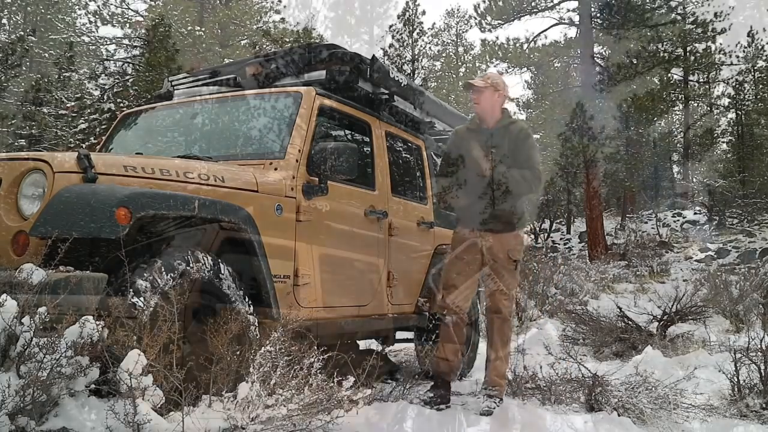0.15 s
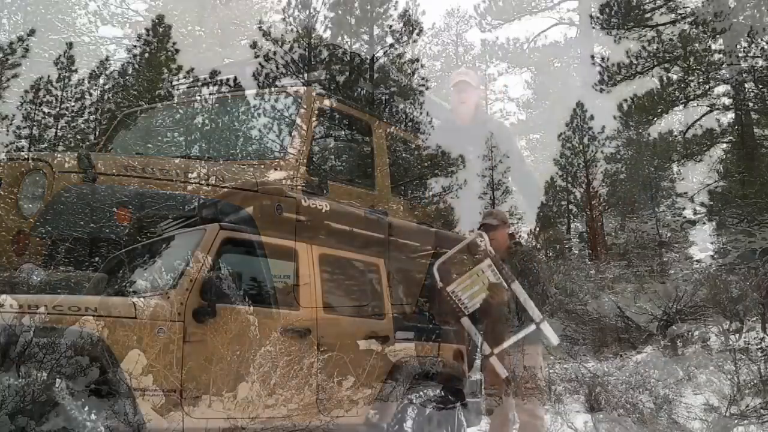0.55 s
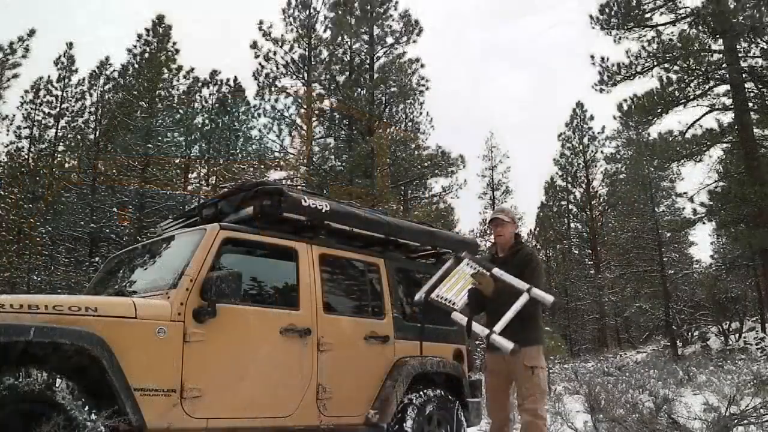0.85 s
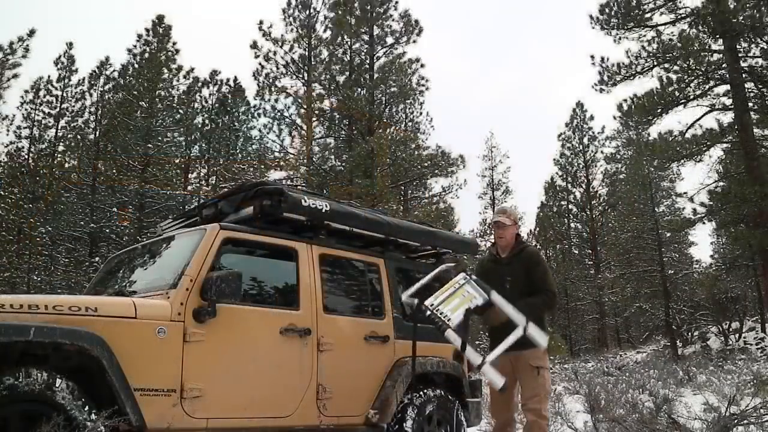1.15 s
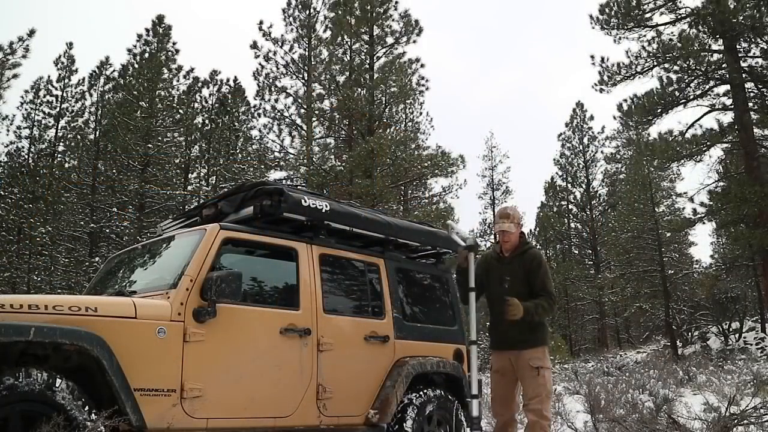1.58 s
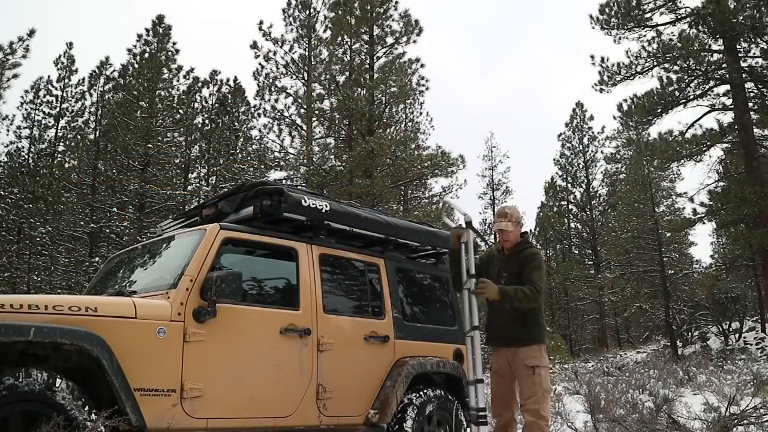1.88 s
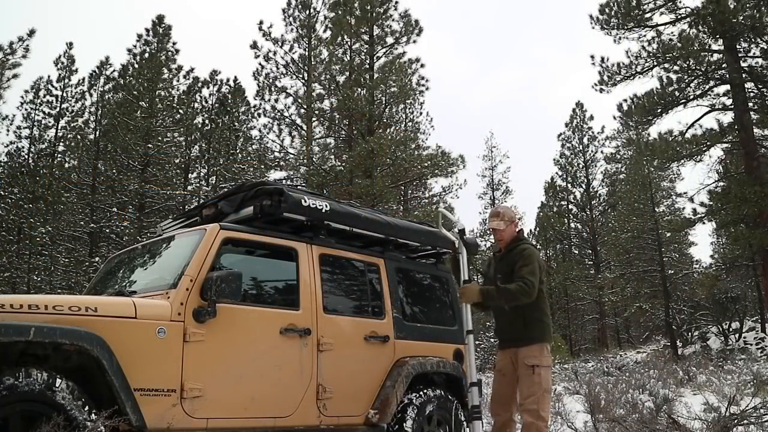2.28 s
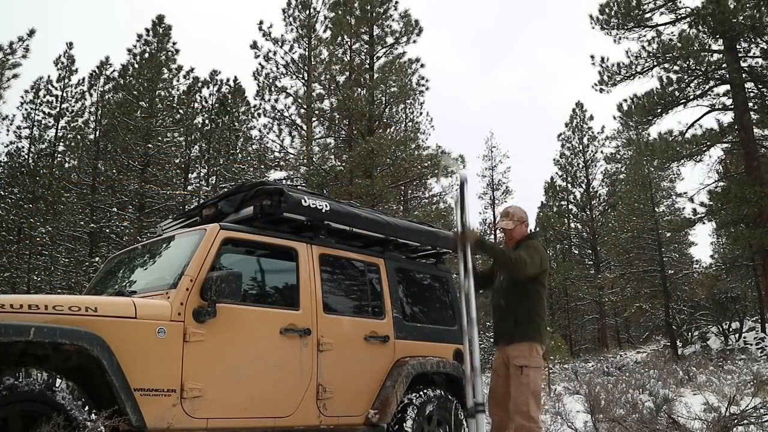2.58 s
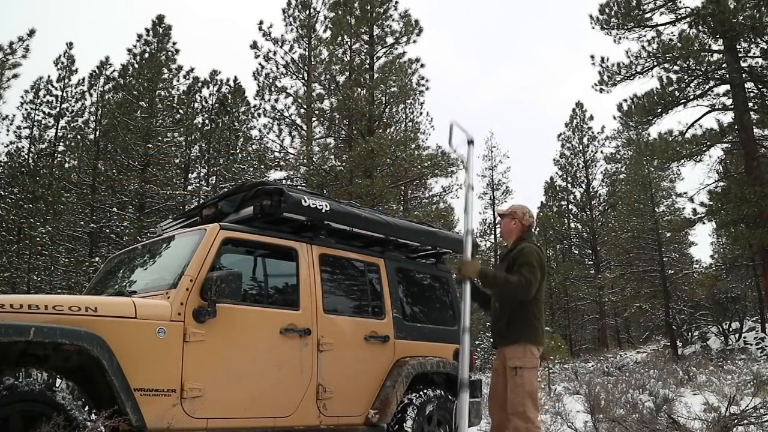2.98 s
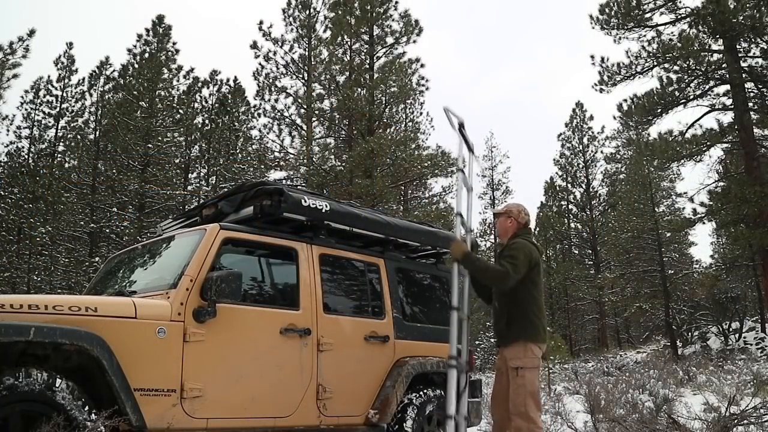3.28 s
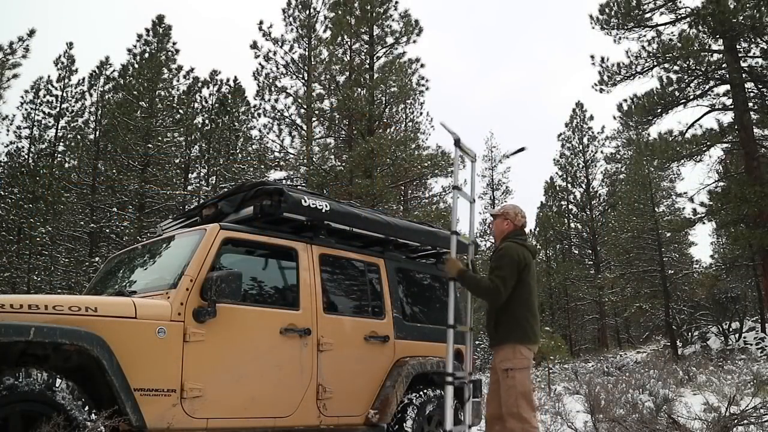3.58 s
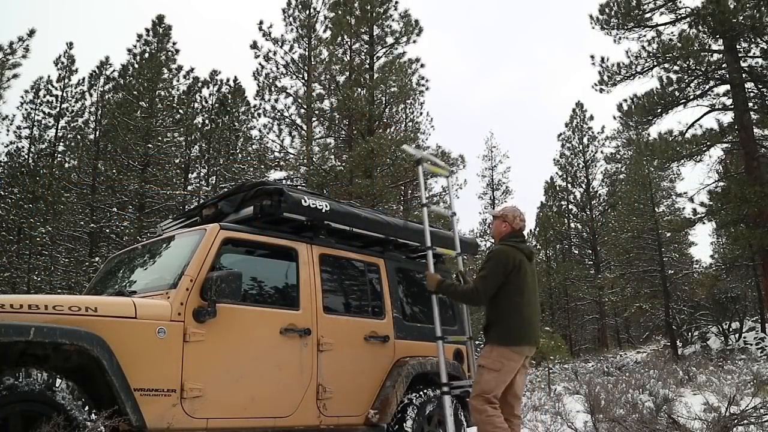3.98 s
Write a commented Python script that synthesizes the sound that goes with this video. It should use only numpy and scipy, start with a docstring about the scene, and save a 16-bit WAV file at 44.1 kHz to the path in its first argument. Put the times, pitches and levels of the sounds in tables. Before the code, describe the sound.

Quiet snowy woods, stereo, from a few metres: a soft thud and faint rustle, a single cupped hand clap over fading low rumble, then a pause. Light metal ticks lead to a burst of hard hollow clacks, followed by separate knocks as ladder sections slide out, scraping and squeaking. Faint rings and a weak woodland echo trail off, and smaller clicks end it in near silence.

```python
"""A snowy forest: one dull hand clap, then a telescoping aluminium ladder is lifted, set down and pulled out
a few metres away. Its tubes slide as gritty noise, squeak as narrow noise bands, chatter against their stops
as bursts of contacts and ring faintly as dying sines; snowy ground and trees give back a thin noise echo.
Soft thuds and rustles are shaped noise. A low rumble dies away at the start and leaves the hush of the forest."""
import sys
import numpy as np
from scipy import signal
from scipy.fft import rfft, irfft
from scipy.io import wavfile
from scipy.ndimage import uniform_filter1d

SR = 44100
rng = np.random.default_rng(int(sys.argv[2]) if len(sys.argv) > 2 else 0)


def unload_wav(signal):
    """Save mono or channel-first audio to the path in sys.argv[1] as 16-bit WAV at rate SR, clipped to [-1, 1]."""
    wavfile.write(
        sys.argv[1],
        SR,
        np.round(np.clip(np.atleast_2d(signal).T, -1, 1) * 32767).astype(np.int16),
    )


N = 182262
TIME = np.arange(N) / SR

# colour of tube rubbing on tube: frequency_hz, relative level_db (per Hz)
RUB = [(290, -38), (500, -7), (1410, -7.5), (1590, 0), (2010, 0), (2430, -2), (2790, -5), (4080, -2),
       (5080, -11.5), (5660, -8), (13000, -44.5)]
# left-right likeness of diffuse sound: frequency_hz, likeness (0 to 1)
DIFFUSE = [(60, 0.071), (400, 0.0031), (2000, 0.017), (12000, 0)]


def gain_of(db):
    """Decibels to amplitude."""
    return 10 ** (np.asarray(db) / 20)


def evened(x):
    """Scaled to rms 1."""
    return x / np.sqrt(np.mean(x ** 2) + 1e-20)


def unit(x):
    """Scaled to a mean energy of 1 per channel."""
    return evened(x) / np.sqrt(x.shape[-1])


def read(points, hz):
    """A frequency table read on a log-frequency axis."""
    table_hz, value = np.transpose(points)
    return np.interp(np.log(hz + 1), np.log(abs(table_hz) + 1), value)


def level(curve):
    """A dB curve over time as a gain for every sample."""
    return gain_of(np.interp(TIME, *np.transpose(curve)))


def add(mix, start_s, sound):
    """Mixes a sound in at its start time."""
    part = mix[:, max(round(start_s * SR), 0):][:, :sound.shape[-1]]
    part += sound[..., :part.shape[1]]


def coloured(x, db_at, size=2048):
    """Minimum-phase filter with the gain db_at(Hz), so that attacks stay sharp."""
    hz = abs(np.fft.fftfreq(size, 1 / SR))
    log_gain = np.log(gain_of(np.maximum(db_at(hz), -100)))
    taps = np.fft.ifft(np.exp(np.conj(signal.hilbert(log_gain)))).real
    return signal.fftconvolve(x, taps[None], axes=1)[:, :x.shape[1]]


def noise_pair(size, colour=((1, 0), (SR, 0)), likeness=None):
    """Noise of a given colour, partly alike at the two microphones."""
    # left-right likeness of direct sound: frequency_hz, likeness (0 to 1)
    direct = [(60, 0.34), (200, 0.37), (500, 0.97), (1300, 0.74), (2600, 0.66), (5000, 0.39), (12000, 0.39)]
    hz = np.fft.rfftfreq(size, 1 / SR)
    left, other = rfft(rng.standard_normal((2, size)))
    same = np.clip(read(direct if likeness is None else likeness, hz), -1, 1)
    right = same * left + np.sqrt(1 - same ** 2) * other
    return evened(irfft(np.array([left, right]) * gain_of(read(colour, hz)), size))


def flutter(depth_db, size):
    """A gain that wanders at random over about size samples."""
    wander = evened(uniform_filter1d(rng.standard_normal(N), size))
    return evened(gain_of(depth_db * wander))


def strokes(rows, rise_db_per_s, fall_db_per_s):
    """The gain of a series of movements: each swells, holds and dies away."""
    gain = 0
    for start_s, length_s, level_db in rows:
        rise_db = rise_db_per_s * np.maximum(start_s - TIME, 0)
        fall_db = fall_db_per_s * np.maximum(TIME - start_s - length_s, 0)
        gain = gain + gain_of(level_db - rise_db - fall_db)
    return gain


def from_right(x, lag_s, side_db):
    """The left microphone hears the sound later and weaker."""
    delay = np.exp(-2j * np.pi * np.fft.rfftfreq(N, 1 / SR) * lag_s)
    left = irfft(rfft(x[0]) * delay, N)
    return np.array([left * gain_of(-side_db / 2), x[1] * gain_of(side_db / 2)])


def hush():
    """The quiet forest: diffuse noise with a slow swell and a small random flutter."""
    # colour: frequency_hz, relative level_db (per Hz)
    hush_colour = [(15, -44.5), (25, -13.5), (113, -4.5), (237, -15), (286, -4.5), (344, -7), (392, -5),
                   (448, -3.5), (684, -6), (1230, -13.5), (2640, -18.5), (6160, -31), (12000, -41.5),
                   (15000, -54)]
    # slow change of level: time_s, level_db
    swell = [(0, 0), (.55, -1), (.78, 1), (1, 3.5), (3.3, 2), (4.13, 2.5)]
    return gain_of(-65.5) * noise_pair(N, hush_colour, DIFFUSE) * level(swell) * flutter(.7, size=4000)


def rumble():
    """Air on the microphones: low, fluttering noise that fades steadily, then closes to silence."""
    # colour: frequency_hz, relative level_db (per Hz)
    rumble_colour = [(18, -54), (30, -29), (87, 1), (273, 1.5), (412, -11.5), (485, -16), (526, -22),
                     (1150, -28.5), (1320, -40.5), (1500, -23), (1950, -57), (3300, -120)]
    start_db, fade_db_per_s = -47.5, 32
    fade = gain_of(start_db - fade_db_per_s * TIME) * np.interp(TIME, [.65, .9], [1, 0])
    return noise_pair(N, rumble_colour, DIFFUSE) * flutter(1.3, size=1500) * fade


def rustle():
    """Boots and cloth of someone moving in snow: fluttering noise in short strokes."""
    # movements: start_s, length_s, level_db
    moves = [(0, 0.0075, -57), (.2, 0.022, -69), (.325, 0.016, -59), (.47, 0.2, -75)]
    colour = [(200, -9.5), (700, 0.0), (2000, 0.5), (4000, -7.5), (8000, -19), (13000, -40.5)]  # (Hz, dB)
    gain = strokes(moves, rise_db_per_s=599.5, fall_db_per_s=150)
    return noise_pair(N, colour, DIFFUSE) * gain * flutter(2.2, size=200)


def thuds(size=8192):
    """Ladder feet and boots push softly against snow and frame: low noise bumps with a rounded onset."""
    # bumps: start_s, level_db (before the envelope), pitch_hz, t60_s
    bumps = [(.016, -27.5, 167, 0.069), (0.534, -57, 119, 0.86), (.605, -62, 124, .2),
             (1.379, -46, 256, 0.047), (1.61, -40.5, 126, 0.12), (2.025, -54, 234, 0.061),
             (2.573, -33.5, 378, .05)]
    t, out = np.arange(size) / SR, np.zeros((2, N))
    for start_s, level_db, hz, t60_s in bumps:
        colour = [(hz / 4, -32), (hz / 2, -9), (hz, 0), (hz * 2, -5), (hz * 5, -35), (hz * 20, -80)]
        push = noise_pair(size, colour, DIFFUSE)
        envelope = (1 - np.exp(-t / 0.0043)) * gain_of(-60 * t / t60_s)
        add(out, start_s, gain_of(level_db) * push * envelope)
    return out


def clap(start_s=.2586, energy_db=6.5, size=4096):
    """Air bursts from between the palms and takes the colour of their hollow; things nearby scatter it."""
    # colour of the hollow: frequency_hz, relative level_db (per Hz)
    hollow = [(59, -58), (100, -29), (229, -19), (502, 0.5), (592, -2), (713, -12), (1100, -8.5),
              (1350, -22), (2050, -3.5), (3030, -20), (3290, -11.5), (3890, -11.5), (4780, -24),
              (8010, -32.5), (14000, -57.5)]
    t, out = np.arange(size) / SR, np.zeros((2, N))
    # the palms meet over a few milliseconds: a flat spectrum, smeared in time
    smear = rfft(rng.standard_normal(size) * np.exp(-t / 0.002))
    flat = irfft(smear / (abs(smear) + 1e-9), size)[None]
    burst = unit(flat * np.exp(-(t / 0.0073) ** 2))
    scatter = gain_of(-13.0) * unit(noise_pair(size) * np.exp(-t / .006))
    hands = coloured(burst + scatter, lambda hz: read(hollow, hz))
    add(out, start_s, gain_of(energy_db) * unit(hands))
    return out


def trees(x, level_db=-24, t60_s=0.63):
    """Trunks scatter a weak, late echo from all sides: a swelling, dying noise tail."""
    # colour of the echo: frequency_hz, relative level_db
    echo = [(100, 1.5), (500, 5.5), (2500, 0.5), (6000, -5.5), (12000, 6)]
    t = np.arange(SR) / SR
    tail = noise_pair(SR, echo, DIFFUSE) * (1 - np.exp(-t / 0.033)) * gain_of(-60 * t / t60_s)
    return gain_of(level_db) * signal.fftconvolve(x, unit(tail), axes=1)[:, :N]


def scrape():
    """Tubes slide in their sleeves: rubbing noise plus grit that catches as sparse, tiny ticks."""
    # sliding strokes: start_s, length_s, level_db
    slides = [(.89, 0.3, -72), (1.28, 0.35, -58), (1.55, .05, -41), (1.78, 0.022, -52),
              (1.97, 0.017, -58.5), (2.1, .1, -74.5), (2.43, 0.24, -53.5), (2.96, 0.18, -65),
              (3.41, 0.23, -69), (3.93, 0.063, -67.5)]
    catches = rng.standard_normal(N) * (rng.random(N) < 220 / SR)  # about 220 a second
    tick = noise_pair(512, RUB) * np.exp(-TIME[:512] / .0015)
    grit = evened(signal.fftconvolve(catches[None], tick, axes=1)[:, :N])
    rubbing = noise_pair(N, RUB) * flutter(1.2, size=150)
    return evened(rubbing + 1.1 * grit) * strokes(slides, rise_db_per_s=380, fall_db_per_s=210)


def squeak(length_s, hz, width_hz, level_db):
    """Friction in the collar feeds one resonance of the tube for the length of a stroke."""
    f = np.geomspace(100, 16000, 600)
    colour = np.transpose([f, -20 * np.log10(1 + (2 * (f - hz) / width_hz) ** 2)])
    size = max(round(length_s * SR), 64)
    return gain_of(level_db) * noise_pair(size, colour) * signal.windows.tukey(size, .8)


def approach(knock_db, rub_db=-27, swell_s=0.0043, size=660):
    """The tube rubs harder in the last moments before it meets its stop."""
    swell = np.exp(-np.arange(size)[::-1] / SR / swell_s)
    return gain_of(knock_db + rub_db) * noise_pair(size, RUB) * swell


def mode(t, hz, t60_s, spread_s=.000025):
    """A dying sine that reaches the two microphones a little out of step."""
    offset_s = spread_s * rng.standard_normal((2, 1))
    return gain_of(-60 * t / t60_s) * np.sin(2 * np.pi * hz * (t + offset_s))


def knock(stretch, ring_db, knock_db, part_hz, part_db, rung_hz, body_db, edge_db, size=16384):
    """A tube hits its stop and chatters; frame clacks, struck part and rung sing briefly, tubes ring on."""
    # colour of the frame: frequency_hz, relative level_db (per Hz)
    clack_colour = [(71, -66.5), (120, -30), (176, -41), (224, -13), (280, -20), (387, -10), (710, -4),
                    (852, -5.5), (2110, -5), (2390, -7), (3230, -4), (3500, -2.5), (7700, -17.5),
                    (10900, -33), (15000, -59.5)]
    # modes of the hollow tubes: pitch_hz (before the stretch), relative level_db, t60_s
    tube_modes = [(1550, -23, .3), (1800, -21, .3), (2455, -2.5, 0.24), (2650, -13.5, 0.22),
                  (2660, -11, 0.24), (2890, -8, 0.18), (3190, -10.5, 0.18), (3700, -17, 0.099),
                  (3830, -19, 0.2), (3950, -18, 0.1), (6200, -30.5, .25), (6740, -24.5, .25)]
    t = np.arange(size) / SR
    # the first contact is followed by a quick flurry as the loose joint settles
    settle = t / .0022
    hits = rng.standard_normal(size) * (rng.random(size) < 1100 / SR)
    contacts = 5.1 * hits * np.sqrt(settle) * np.exp(-1.2 * settle)
    contacts[0] = 1
    # crowded modes of the frame, damped by hands and plastic collars: a fast and a slower decay of power
    decay = gain_of(-120 * t / 0.058) + gain_of(-55.5 - 120 * t / .11)
    shaken = signal.fftconvolve(contacts ** 2, decay)[:size]
    frame = unit(noise_pair(size) * np.sqrt(abs(shaken)))
    low_db, high_db = body_db + 13, 1.1 * (edge_db + 14.5)

    def clack_db(hz):
        """Frame colour with this knock's own low body and bright edge."""
        low_shelf = low_db / (1 + (hz / 1200) ** 4)
        high_shelf = high_db / (1 + (4800 / (hz + 1)) ** 4)
        return read(clack_colour, hz) + low_shelf + high_shelf

    clack = coloured(frame + 0.74 * unit(contacts), clack_db)
    detune = 1 + 0.014 * rng.standard_normal()  # no two rails are quite alike
    part = gain_of(part_db) * unit(mode(t, part_hz * detune, 0.038) * (1 - np.exp(-t / 0.0026)))
    rung = gain_of(np.minimum(body_db, 0) - 2.0) * unit(mode(t, rung_hz * detune, 0.088))
    tubes = 0
    for hz, mode_db, t60_s in tube_modes:
        varied = gain_of(mode_db + 0.48 * rng.standard_normal())
        tubes = tubes + varied * mode(t, hz * stretch, t60_s)
    blow = unit(unit(clack) + part + rung)
    return gain_of(knock_db + 12.5) * blow + gain_of(ring_db) * unit(tubes)


def ladder():
    """Each knock lands on one rail, then the other, over the gritty scrape and squeaks of sliding tubes."""
    # a tube sings as it rubs through its collar: middle_s, length_s, pitch_hz, width_hz, level_db
    squeaks = [(.891, .069, 2420, 350, -66), (1.279, 0.16, 4130, 650, -60),
               (1.412, 0.072, 2010, 350, -60.5), (1.484, 0.014, 1750, 400, -40),
               (1.814, .035, 1830, 1100, -40.5), (2.605, 0.043, 2780, 300, -34),
               (2.689, .074, 2580, 200, -53), (3.067, .024, 3000, 1500, -45.5)]
    # grip and overlap detune and damp the tubes: time_s, pitch_factor, ring_db
    grip = [(.95, 1.04, -3), (1.43, 1.06, 3), (1.6, 1.022, 1.5), (1.82, .983, -3), (2.029, 1.03, 0),
            (2.42, 1.07, 1.5), (2.76, 1.002, -5.5), (3.08, 0.98, 7), (3.52, 1.01, 4)]
    # knocks: start_s, level_db (relative), struck part_hz (before detune), part_db, rung_hz (before detune),
    # low body_db (relative), bright edge_db (relative), second rail's lag_s
    knocks = [(0.922, -41.5, 2690, -3, 1360, -9, -14, 0.0023),
              (.937, -26.5, 2910, -12.5, 964, -12.5, -22, 0.0045),
              (.969, -36.5, 3540, -13, 614, -2, -16, 0.0041),
              (.9995, -40, 4170, 2.5, 775, -11, -12.5, .005),
              (1.056, -39.5, 3993, -3.5, 1240, -16.5, -36, .003),
              (1.3133, -16.5, 3224, -4, 1296, -23.5, -16, 0.0064),
              (1.4338, -17.5, 2290, -3, 770, -26, -24, 0.0046),
              (1.4933, -21, 1567, -2.5, 1300, -17, -20, 0.0021),
              (1.5026, -13, 2920, -6.5, 705, -15, -10.5, 0.0049),
              (1.5244, -8.5, 2990, -8.5, 697, -15.5, -16.5, .008),
              (1.566, -17.5, 4170, -5.5, 772, -12, -23.5, 0.0041),
              (1.582, -11, 2594, -2, 1340, -20.5, -23, .004),
              (1.600, -18.5, 2584, -6, 935, -13.5, -13, .008), (1.6153, -13, 2372, -8, 800, -16, -16, .002),
              (1.686, -39.5, 2475, -8, 1100, -23, -20, .004),
              (1.758, -29.5, 2593, -5.5, 785, -18, -21.5, 0.0082),
              (1.8185, -7, 3184, -3.5, 1330, -24.5, -23, .0035),
              (2.023, -18.5, 3366, -8, 1076, -15.5, -18, 0.0046),
              (2.091, -39.5, 2740, -7.5, 692, -12.5, -23, .004),
              (2.1155, -39, 2775, -3, 579, -25, -32, .004),
              (2.228, -38.5, 4115, -6, 790, -24, -22.5, 0.0019),
              (2.4059, -42, 4030, -4, 468, -20.5, -9, .003),
              (2.4164, -33, 2480, -5, 1026, -15, -15.5, .002),
              (2.478, -24, 2710, -4, 1210, -22.5, -17.5, .004),
              (2.496, -33, 1740, -6.5, 650, -10, -21.5, .004),
              (2.568, -14.5, 2130, 2.5, 1070, -11.5, -19.5, .003),
              (2.574, -5.5, 2884, -6, 680, -23, -15, .005),
              (2.623, -15.5, 2306, -3, 1005, -20.5, -20, 0.0031),
              (2.6632, -28, 3815, 4.5, 1330, -21, -23, .003), (2.739, -19, 1904, 5, 1400, -21, -22, 0.0044),
              (2.7613, -9, 1760, -7, 1280, -27, -20.5, 0.0039),
              (2.934, -38.5, 1610, -12, 636, 1, -56, 0.0038), (2.957, -41.5, 1800, -6, 830, 2, -15, 0.0042),
              (3.032, -31, 1875, -6.5, 681, -8.5, -13, 0.0028),
              (3.0746, -21.5, 3400, -7, 1030, -8.5, -9, .003),
              (3.388, -37.5, 1787, -10, 529, -8, -7.5, 0.0049),
              (3.523, -25, 664, -7.5, 662, -8.5, -8.5, .006)]
    ring_offset_db, ring_growth = -2.5, 0.93  # the ring grows a little less than the blow (dB per dB)
    second_rail_db = -.5
    held_rail_db = 13.5  # the hand damps the ring of the second rail
    out = scrape()
    for middle_s, length_s, *voice in squeaks:
        add(out, middle_s - length_s / 2, squeak(length_s, *voice))
    grip_s, stretches, free_db = np.transpose(grip)
    for start_s, knock_db, *tone, lag_s in knocks:
        rub = approach(knock_db)
        add(out, start_s - rub.shape[1] / SR, rub)
        stretch = np.interp(start_s, grip_s, stretches)
        ring_db = ring_offset_db + ring_growth * knock_db + np.interp(start_s, grip_s, free_db)
        add(out, start_s, knock(stretch, ring_db, knock_db, *tone))
        second = knock(stretch, ring_db - held_rail_db, knock_db + second_rail_db, *tone)
        add(out, start_s + lag_s, second)
    return out


def scene():
    """Clap and ladder stand a little to the right, among the trees."""
    background = hush() + rumble() + rustle()
    hands = from_right(clap(), lag_s=.000028, side_db=1.8)
    metal = from_right(ladder(), lag_s=.000035, side_db=2.5)
    return background + thuds() + hands + metal + trees(metal + hands / 2)


def record(dry):
    """The recorder's band limit: a steep low-pass."""
    edge_hz = 15650
    taps = signal.firwin(511, edge_hz, window=("kaiser", 9), fs=SR)
    return signal.oaconvolve(dry, taps[None], "same")


dry = scene()
out = record(dry)
unload_wav(out)
```